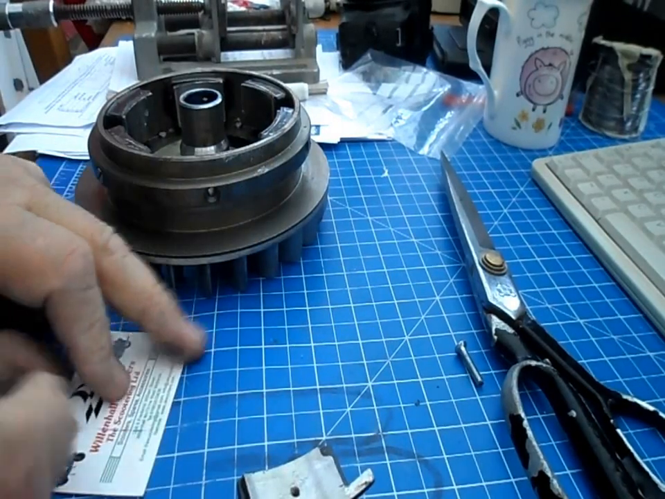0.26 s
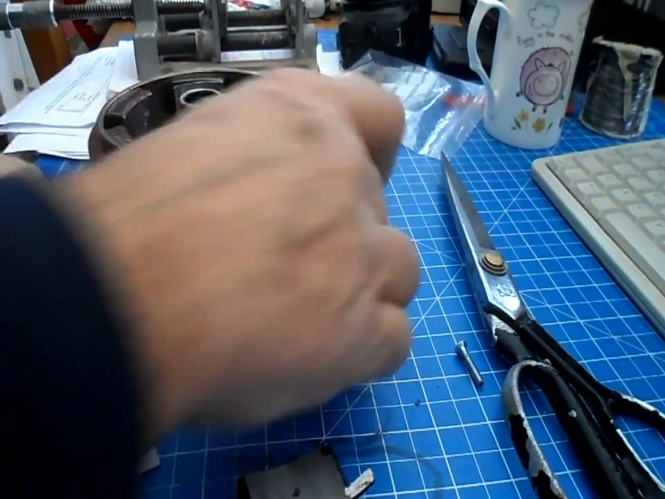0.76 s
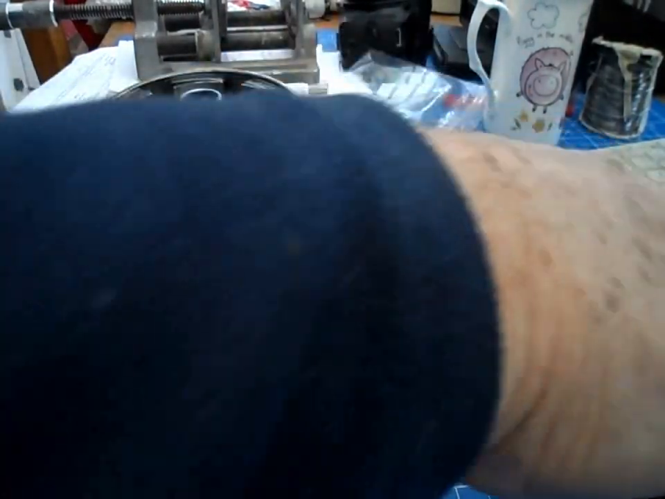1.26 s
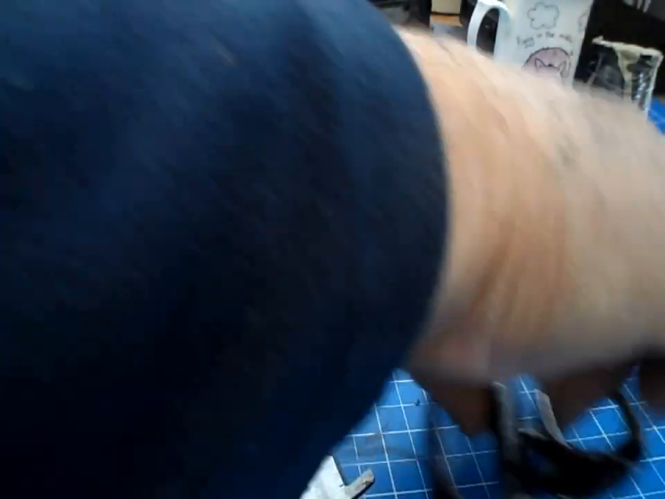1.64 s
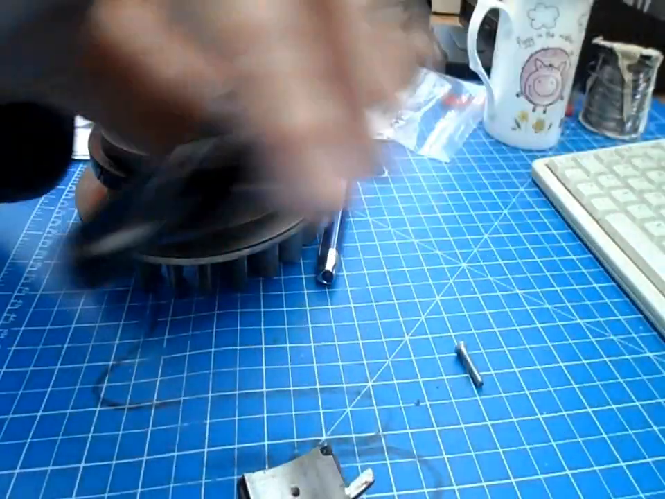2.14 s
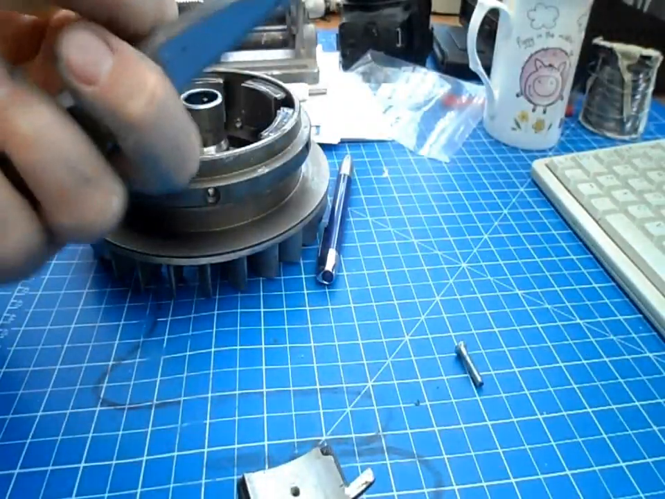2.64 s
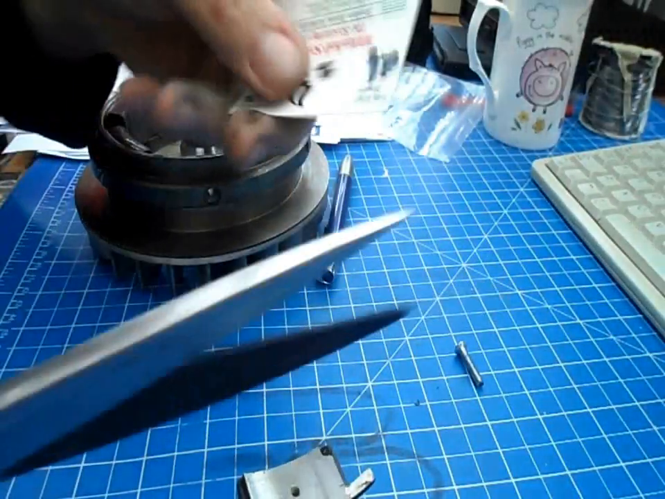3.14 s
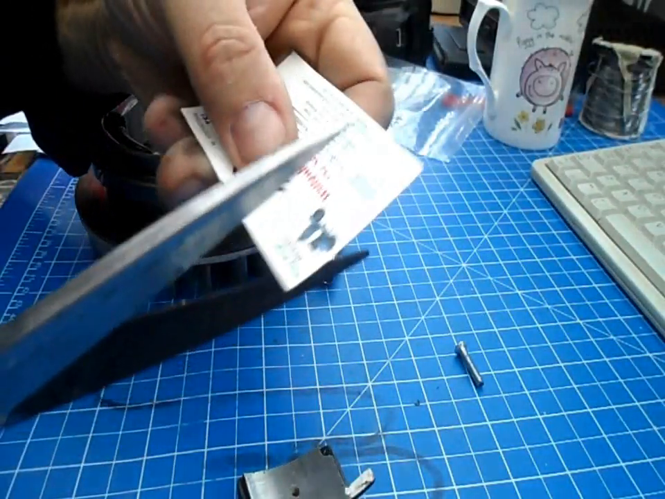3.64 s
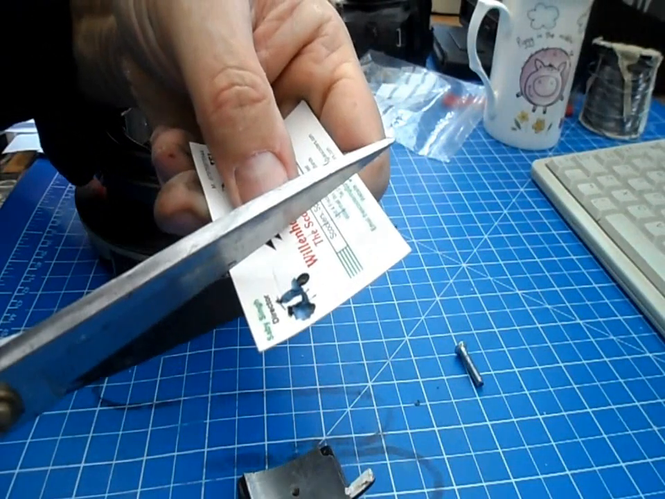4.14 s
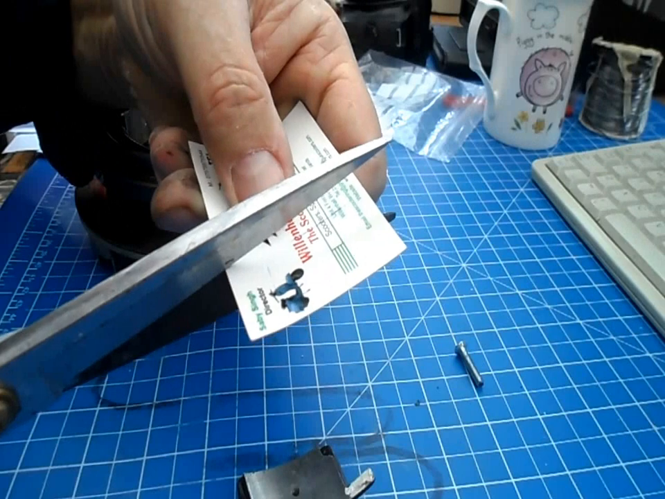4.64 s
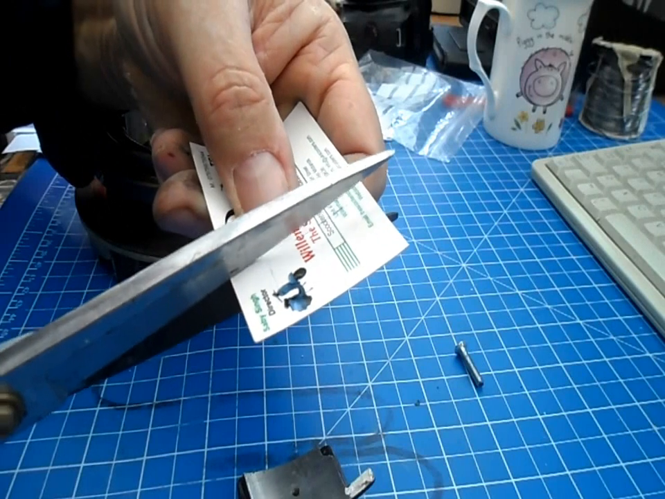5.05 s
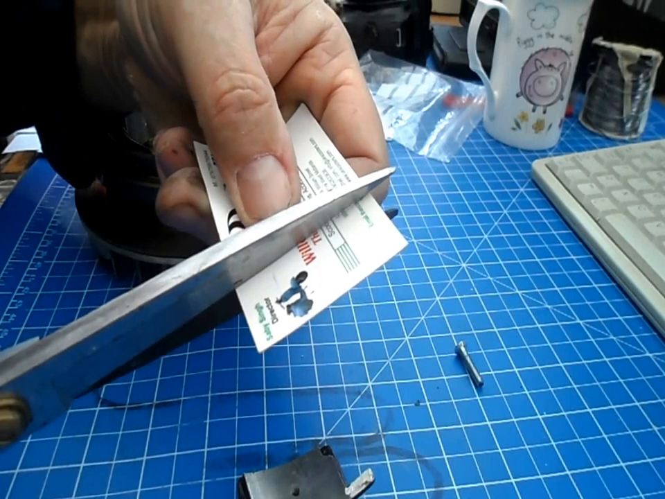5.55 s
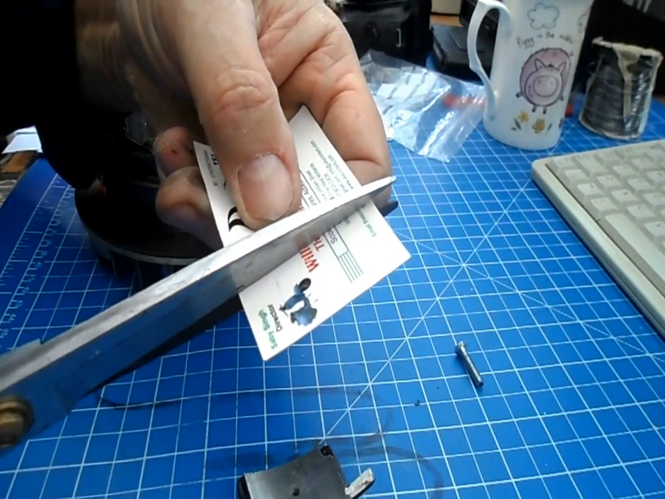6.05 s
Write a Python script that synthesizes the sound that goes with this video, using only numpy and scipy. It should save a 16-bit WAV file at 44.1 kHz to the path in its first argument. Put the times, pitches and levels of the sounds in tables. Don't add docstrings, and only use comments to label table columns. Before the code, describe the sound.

A quiet small room with low building rumble, faint hum and recorder hiss, heard from close to a bench. From 0 to 1 s, card and hand rub softly over a mat with papery swishes, low drag and tiny grit ticks. At 1.14 s a pen drops: hard woody knocks and bright plastic clicks bounce until 1.3 s, loudest at 1.22. At 1.74 s scissors clack with a sharp, bright steel rattle, then a duller handle knock and low thump at 1.96. A faint distant moan passes at 2.0-2.5 s. Light metal clicks come at 2.58 and around 2.65. From 3.15 to 3.5 s blades click, squeak and rasp on card; swishing scrapes follow near 3.8 and 4.2. Quiet hiss remains, with a brief low moan near 4.9. From 5.2 to 6.3 s the blades creep through card in faint, dry, irregular fibre crackles.

```python
import sys
import numpy as np
from scipy import signal
from scipy.fft import rfft, irfft, next_fast_len
from scipy.io import wavfile
from scipy.ndimage import uniform_filter1d

SR = 44100
rng = np.random.default_rng(int(sys.argv[2]) if len(sys.argv) > 2 else 0)


def gain_from_decibels(decibels):
    exponent = np.asarray(decibels, float) / 20
    return 10 ** exponent


def bounce(signal):
    frames = np.transpose(np.atleast_2d(signal))
    limited = np.clip(frames, -1, 1)
    pcm = np.round(limited * 32767).astype(np.int16)
    wavfile.write(sys.argv[1], SR, pcm)


N = 277389


def evened(x):
    return x / np.sqrt(np.mean(x ** 2) + 1e-20)


def peaked(x):
    return x / np.sqrt(uniform_filter1d(x ** 2, 176).max() + 1e-20)


def read(points, hz):
    f, value = np.transpose(points)
    return np.interp(np.log(hz + 1), np.log(f + 1), value)


def add(mix, s, sound):
    part = mix[round(s * SR):][:len(sound)]
    part += sound[:len(part)]


def coloured(x, spectrum):
    size = next_fast_len(len(x))
    gain = gain_from_decibels(read(spectrum, np.fft.rfftfreq(size, 1 / SR)))
    return evened(irfft(rfft(x, size) * gain, size)[:len(x)])


def patchy(x, patch_db):
    z = signal.stft(x, nperseg=256)[2]
    patches = uniform_filter1d(rng.standard_normal(z.shape), size=5, axis=0)
    patches = evened(uniform_filter1d(patches, size=8, axis=1))
    gain = gain_from_decibels(patch_db * 2 * np.tanh(patches / 2))
    return signal.istft(z * gain, nperseg=256)[1][:N]


def contact(length):
    t = np.arange(1300) / SR
    return rng.standard_normal(len(t)) * np.exp(-t / max(length, .0001))


def tick(force, low_hz, high_hz):
    band = signal.butter(3, [low_hz, min(high_hz, 20000)], "band", fs=SR, output="sos")
    return peaked(signal.sosfilt(band, force))


def ring(force, modes, spread, longest, pitch=1):
    t = np.arange(0, min(longest + .05, .25), 1 / SR)
    hz, db, t60 = np.transpose(modes)[:, :, None]
    luck = rng.standard_normal((2, len(modes), 1))
    hz = hz * pitch * (1 + spread * luck[1])
    reach = abs(np.exp(2j * np.pi * hz * t[:len(force)]) @ force)[:, None]
    decay_db = 60 * t / np.clip(t60, .002, longest)
    fall = gain_from_decibels(db + 1.5 * luck[0] - decay_db) / (reach + .1 * reach.mean())
    response = (fall * np.sin(2 * np.pi * hz * t + 1.027 * luck[1])).sum(0)
    return peaked(signal.fftconvolve(response, force)[:len(t)])


# pitch_hz [Hz], level_db [dB rms]
HUM_TONES = [(30, -69.5), (347, -85.5)]


def hum():
    t = np.arange(N) / SR
    waver = uniform_filter1d(rng.standard_normal(N), size=9000)
    waver = evened(uniform_filter1d(waver, size=9000))
    out = np.zeros(N)
    for hz, db in HUM_TONES:
        out += np.sqrt(2) * gain_from_decibels(db + 0.54 * waver) * np.sin(2 * np.pi * hz * (t + 0.0018 * waver))
    return out


# pitch_hz [Hz], level_db [dB per Hz]
RUMBLE_SPECTRUM = [(7.1, -9), (12, -4), (32, -1), (98, -9.5), (117, -10), (135, -9), (220, -15.5),
                   (259, -19.5), (288, -16.5), (316, -22.5), (345, -14.5), (371, -22), (406, -22),
                   (563, -26), (900, -38), (1170, -49.5), (1980, -120)]


def rumble():
    return gain_from_decibels(-62.5) * coloured(rng.standard_normal(N), RUMBLE_SPECTRUM + [(1100, -82.0)])


# pitch_hz [Hz], level_db [dB per Hz]
HISS_SPECTRUM = [(290, -26.5), (500, -8), (700, -2), (764, -2), (1660, -5.5), (2220, -7.5), (3990, -9.5),
                 (15100, -14), (16500, -14)]


def hiss():
    return gain_from_decibels(-71) * coloured(rng.standard_normal(N), [(400, -64.5)] + HISS_SPECTRUM)


def hush(x):
    power_db = 10 * np.log10(abs(uniform_filter1d(x ** 2, 2000)) + 1e-12)
    fall = np.arange(N) * 9.5 / SR
    held_db = np.maximum.accumulate(power_db + fall) - fall
    over_db = np.maximum(held_db + 43.0, 0)
    return gain_from_decibels(-.3 * uniform_filter1d(over_db, 2000))


# start_s [s], pitch_hz [Hz], level_db [dB]
MOAN_GLIDES = [
    [(2.04, 277, -67.5), (2.138, 277.2, -74), (2.254, 277.5, -67.5), (2.378, 233.6, -65),
     (2.422, 226.4, -64.5), (2.48, 228, -74), (2.5, 258, -80)],
    [(4.9, 219, -79), (4.92, 228.7, -68.5), (5.016, 223, -63.5), (5.034, 217, -86.5), (5.05, 209.7, -71)],
]


def moans():
    out = np.zeros(N)
    for rows in MOAN_GLIDES:
        s, hz, db = np.transpose(rows)
        t = np.arange(s[0], s[-1], 1 / SR)
        phase = 2 * np.pi * np.cumsum(np.interp(t, s, hz)) / SR
        tone = np.sin(phase) * signal.windows.tukey(len(t), .2)
        add(out, s[0], np.sqrt(2) * gain_from_decibels(np.interp(t, s, db)) * tone)
    return out


# pitch_hz [Hz], t60_s [s]
ROOM_T60 = [(100, 0.265), (400, 0.35), (1000, 0.34), (3000, 0.32), (8000, 0.22), (16000, 0.2)]
# pitch_hz [Hz], level_db [dB]
ROOM_SPECTRUM = [(100, -8.5), (350, 4.5), (600, 0.5), (950, -2.5), (1500, -3), (2100, -4.5), (3000, -2),
                 (4500, -5), (8000, 0.5), (13000, 0)]


def room(x):
    hz, t, z = signal.stft(rng.standard_normal(SR // 2), SR, nperseg=256)
    z = z / (abs(z) + 1e-9)
    decay_db = 60 * t / np.maximum(read(ROOM_T60, hz), .03)[:, None]
    tail = signal.istft(z * gain_from_decibels(read(ROOM_SPECTRUM, hz)[:, None] - decay_db), SR, nperseg=256)[1]
    tail = signal.sosfilt(signal.butter(2, 110, "high", fs=SR, output="sos"), tail)
    tail = tail * np.clip((np.arange(len(tail)) / SR - .007) / 0.0031, 0, 1)
    return signal.fftconvolve(x, tail / np.linalg.norm(tail))[:N]


# start_s [s], level_db [dB], low_hz [Hz],
# high_hz [Hz]
CONTACT_SPECKS = [(.008, -58.5, 2000, 16000), (.012, -49.5, 4320, 9167), (.0125, -57.5, 9000, 16000),
                  (.225, -54, 8300, 14000), (0.25, -54, 9720, 15000), (.299, -57.5, 6500, 14000),
                  (.347, -54, 7500, 16000), (.648, -67, 10000, 15000), (1.634, -62, 4800, 11000),
                  (1.637, -61.5, 4500, 9500), (1.7422, -37.5, 3000, 14030), (1.7456, -34, 3000, 14000),
                  (2.895, -72, 1500, 5000), (3.02, -68, 4000, 11100), (3.287, -70, 6000, 10000),
                  (3.3838, -52, 8000, 15500), (3.4035, -56, 7500, 15000), (3.406, -57, 7500, 15000),
                  (3.4113, -58, 1500, 4000), (3.4685, -51, 6000, 12000)]


def specks():
    out = np.zeros(N)
    for s, db, low_hz, high_hz in CONTACT_SPECKS:
        add(out, s, gain_from_decibels(db) * tick(contact(.0008), low_hz, high_hz))
    return out


# start_s [s], length_s [s],
# from_hz [Hz], to_hz [Hz], level_db [dB]
SQUEAK_GLIDES = [(0.79, 0.091, 3500, 3350, -70), (.82, 0.39, 3350, 3350, -71),
                 (3.152, 0.0165, 3400, 3450, -67), (1.855, 0.044, 2500, 2400, -70),
                 (1.197, 0.007, 3000, 2400, -44), (1.8, 0.037, 600, 600, -55.5),
                 (.675, 0.023, 7300, 7100, -73), (.115, .11, 6700, 6300, -63.5),
                 (3.465, 0.036, 5000, 5250, -62), (3.48, .03, 8100, 6500, -64),
                 (3.401, 0.0133, 4000, 3150, -50.5), (3.402, 0.0112, 2340, 1740, -53),
                 (3.406, 0.0085, 820, 730, -54.5), (3.463, .024, 2400, 1000, -54),
                 (3.46, 0.026, 3000, 2660, -58), (3.464, 0.012, 7200, 7300, -51),
                 (3.455, .018, 7100, 8900, -54), (3.45, .02, 10500, 11000, -58),
                 (3.46, .03, 9000, 11500, -55.5), (3.45, 0.022, 12000, 12500, -58),
                 (3.491, 0.016, 3500, 3600, -61), (3.541, .028, 3600, 3900, -63.5),
                 (4.2, 0.036, 3600, 3900, -64), (3.548, 0.023, 6100, 5900, -65),
                 (3.62, 0.34, 3950, 4050, -72.5), (1.517, 0.029, 240, 246, -57.5)]
SQUEAK_BANDWIDTH = 140, 0.032, 500
# start_s [s], length_s [s], from_hz [Hz], to_hz [Hz], level_db [dB]
SWISH_GLIDES = [
    (.004, 0.097, 905, 847, -53),
    (.67, 0.046, 2800, 3160, -60.5),
    (1.6, .1, 910, 788, -66.5),
    (2.585, .06, 5900, 5600, -65.5),
    (3.198, .04, 5600, 5300, -62),
    (3.252, .03, 5000, 5400, -66),
    (3.79, 0.11, 5860, 5020, -58),
    (3.82, 0.11, 4025, 4530, -60.5),
    (4.165, 0.12, 1987, 2093, -62),
    (4.17, 0.13, 4990, 3510, -62),
]
SWISH_BANDWIDTH = 30, 0.42, 0


def squeaks():
    out = np.zeros(N)
    for rows, (width_hz, share, blur_hz) in ((SQUEAK_GLIDES, SQUEAK_BANDWIDTH),
                                             (SWISH_GLIDES, SWISH_BANDWIDTH)):
        for start, length, from_hz, to_hz, db in rows:
            t = np.arange(0, 1, 1 / SR / max(length, .004))
            carrier = np.exp(2j * np.pi * np.cumsum(from_hz * (to_hz / from_hz) ** t) / SR)
            width = max(width_hz + share * from_hz + blur_hz * length, 30)
            pole = [1, -np.exp(-np.pi * width / SR)]
            noise = [1, 1j] @ rng.standard_normal((2, SR // 2))
            slow = signal.lfilter([1], pole, signal.lfilter([1], pole, noise))[-len(t):]
            swell = np.sin(np.pi * t ** 0.57)
            add(out, start, gain_from_decibels(db) * evened((carrier * slow).real) * swell)
    return out


# pitch_hz [Hz], level_db [dB per Hz]
HISS_OF_RUB = [(2350, -27), (4000, -7), (5280, -1), (8550, 0.5), (11200, 0), (15100, -3.5), (16000, -23)]
RASP_OF_RUB = [(1200, -1.5), (1700, 1.5), (2600, 3), (4000, -2), (5000, -6.5), (6500, -57)]
BODY_OF_RUB = [(520, -30), (740, -4), (880, 0), (1020, -2), (1200, -8), (1600, -11), (2400, -26),
               (7000, -33), (9000, -48)]
DRAG_OF_RUB = [(25, -3), (60, -3.5), (130, 0), (300, -6), (550, -11), (750, -25.5), (7000, -32),
               (10000, -42.5)]
# start_s [s], fastest_s [s], end_s [s], level_db [dB], pressure_db [dB]
SLIDE_STROKES = [(1.138, 1.175, 1.25, -53, 6), (1.222, 1.238, 1.36, -51.5, 1), (0, .11, 0.66, -64, -5),
                 (.005, .009, 0.091, -70, 31.5), (0.004, .055, 0.4, -80.5, 26), (.085, .285, 0.47, -53, -8),
                 (.08, .36, 0.52, -69.5, 13.5), (.2, .5, 1.5, -68.5, -4.5), (.665, .688, 1.75, -72, 11),
                 (.73, .862, 0.95, -51, -10.5), (.76, .832, 0.94, -73.5, 25), (.78, 1.0, 1.68, -69.5, 0.5),
                 (1.6, 1.638, 1.76, -76, 15), (1.745, 1.76, 1.85, -55, -8), (1.83, 1.87, 2.1, -70.5, 3),
                 (1.97, 2.007, 2.08, -67.5, 3)]
# start_s [s], fastest_s [s], end_s [s], level_db [dB], bite_db [dB]
SCRAPE_STROKES = [(2.58, 2.6, 3.1, -74, -15), (2.78, 2.9, 3.4, -75.5, -11.5), (3.185, 3.22, 3.34, -65, -7),
                  (3.24, 3.262, 3.9, -79, -5.5), (3.385, 3.391, 3.89, -62.5, -1),
                  (3.44, 3.468, 3.535, -51, -16), (3.5, 3.64, 4.4, -69.5, -18),
                  (3.76, 3.808, 4.01, -58.5, -3), (3.78, 3.886, 3.93, -53.5, -14),
                  (3.92, 3.984, 4.1, -65, -4.5), (4.16, 4.168, 4.23, -68, 5), (4.16, 4.24, 4.35, -64.5, 4),
                  (5.2, 5.38, 5.65, -76, -5.5), (5.66, 5.73, 4.8, -82, -10.5), (5.84, 6, 6.7, -94.5, -15),
                  (6.1, 6.27, 5.9, -81, -4)]
# start_s [s], fastest_s [s], end_s [s], level_db [dB], pressure_db [dB]
DRAG_STROKES = [
    (0, .06, 0.44, -58, 20.5),
    (.2, .75, 1.6, -62.5, -1),
    (1.6, 1.635, 1.73, -62.5, -55.5),
    (1.77, 1.83, 1.92, -57, -8),
    (1.99, 2.006, 2, -59, -2),
]
# levels of hiss, rasp, body, drag [dB]; share of the pressure or bite in each [ratio]
SLIDE_BALANCE = (-2.5, -8, -4.5, -17), (0.053, 0.57, 0.94, 0.042), 1.16
SCRAPE_BALANCE = (-0.5, -0.5, -24, -27), (0.042, 0.68, .4, 0.15), 1.42
DRAG_BALANCE = (-63, -60, -15.5, 2), (0, 0, 1, 0), 1.2


def rubs():
    catches = rng.standard_normal(N) * gain_from_decibels(0.83 * np.minimum(rng.exponential(1, N), 5))
    judder = uniform_filter1d(uniform_filter1d(rng.standard_normal(N), 300), 300)
    catches = catches * gain_from_decibels(0.83 * evened(judder))
    kinds = (HISS_OF_RUB, 3.2), (RASP_OF_RUB, 3.2), (BODY_OF_RUB, 1.5), (DRAG_OF_RUB, 1.5)  # patchiness, dB
    layers = np.array([coloured(patchy(catches, patch_db), spectrum) for spectrum, patch_db in kinds])
    power = np.zeros((4, N))
    for rows, (mix_db, shares, pointed) in ((SLIDE_STROKES, SLIDE_BALANCE),
                                            (SCRAPE_STROKES, SCRAPE_BALANCE),
                                            (DRAG_STROKES, DRAG_BALANCE)):
        for start, fastest, end, db, extra_db in rows:
            at = np.arange(max(round(start * SR), 0), min(round(end * SR), N))
            first = .5 * (start <= 0)
            swell = np.interp(at / SR, [start, fastest, end], [first, 1, 0]) ** max(pointed, 1.6)
            level = gain_from_decibels(db + np.add(mix_db, extra_db * np.array(shares)))[:, None]
            power[:, at] += (level * swell) ** 2
    return (layers * np.sqrt(power)).sum(0)


# pitch_hz [Hz], level_db [dB], t60_s [s]
BENCH_MODES = [(616, -11, 0.017), (790, -5.5, 0.039), (905, 6, 0.02), (990, 1.5, .018), (1170, -1, 0.033),
               (1373, 2, 0.024), (1720, 0.5, 0.012), (1940, -6.5, .012), (2740, -12, 0.026)]
THUD_MODES = [(113, -13, .14), (170, -13, .06), (242, -7, .07), (312, -3, .09), (350, -1.5, .085),
              (410, -6, .06), (490, -6, .05)]
BARREL_MODES = [(2800, 6, 0.0045), (3220, 1, 0.011), (4410, 11, 0.00073), (5250, 0.5, 0.0024),
                (6700, -30.5, 0.0055)]
# start_s [s], bench level_db [dB], thud_db [dB re bench], click_db [dB re bench],
# bench pitch factor [ratio]
PEN_BOUNCES = [(1.137, -47.5, -9, -20, 1.6), (1.139, -25.5, -9, -12.5, 1.2), (1.1408, -34.5, -8, -16, .85),
               (1.148, -36.5, -4, -22, 0.65), (1.165, -33, -10.5, -10, 1.2), (1.183, -36.5, -6, -4.5, 0.86),
               (1.193, -46, -11.5, -16, 1.4), (1.2, -46, -2.5, -4.5, 3.1), (1.2228, -15, -14.5, -12, 1.017),
               (1.2326, -38, 6, -8.5, 1.2), (1.2859, -32, -9.5, -6, 1.26),
               (1.2873, -24.5, -19.5, -26.5, 0.975), (1.314, -41.5, -4, -20, 1.07)]
# start_s [s], level_db [dB], low_hz [Hz], high_hz [Hz], contact_s [s]
BARREL_TICKS = [
    (1.14, -52, 6000, 12000, .003),
    (1.1402, -47, 11100, 16000, .002),
    (1.151, -56, 9000, 16000, .002),
    (1.167, -56, 10000, 14000, .002),
    (1.185, -55, 8500, 16000, .002),
    (1.199, -53, 6000, 16000, 0.0035),
    (1.2235, -38, 7000, 16000, .0018),
    (1.2322, -47, 6000, 10000, .003),
    (1.236, -55, 7000, 15000, 0.011),
    (1.2857, -50.5, 6500, 16000, .003),
]


def pen():
    out, blow = np.zeros(N), np.hanning(15)
    for s, db, thud_db, click_db, pitch in PEN_BOUNCES:
        add(out, s, gain_from_decibels(db) * ring(blow, BENCH_MODES, 0.01, longest=.05, pitch=pitch))
        add(out, s, gain_from_decibels(db + thud_db) * ring(blow, THUD_MODES, .015, longest=.25))
        click = ring(contact(0.00018), BARREL_MODES, 0.075, longest=0.01785)
        add(out, s, gain_from_decibels(db + click_db + 1.5) * click)
        add(out, s, gain_from_decibels(db + click_db - 3.0) * tick(contact(0.0018), 1290, 5470))
    for s, db, low_hz, high_hz, length in BARREL_TICKS:
        add(out, s, gain_from_decibels(db) * tick(contact(length), low_hz, high_hz))
    return out


# start_s [s], level_db [dB]
HANDLE_LANDINGS = [
    (1.9608, -42.5),
    (1.742, -54),
]
# pitch_hz [Hz], level_db [dB], t60_s [s]
SAG_MODES = [(113.3, 1, 0.19), (200.7, -5, 0.046)]


def thumps():
    out = np.zeros(N)
    for s, db in HANDLE_LANDINGS:
        add(out, s, -gain_from_decibels(db) * ring(np.hanning(60), SAG_MODES, .01, longest=.3))
    return out


# pitch_hz [Hz], level_db [dB], t60_s [s]
FREE_STEEL_MODES = [(2304, -1.5, 0.026), (2750, -1, .025), (3110, 2.5, 0.021), (4350, 1, 0.036),
                    (5000, -15, .015), (5555, 8.5, 0.025), (6365, 5.5, .02), (6600, 7, 0.033),
                    (7140, -1.5, .015), (8200, 9, 0.04), (9100, 7, 0.027), (9900, 3.5, 0.025),
                    (11650, -9, .03), (14285, -3, .025)]
GRABBED_STEEL_MODES = [(831, -6, 0.042), (1560, -1.5, 0.057), (2370, 2.5, 0.03), (2993, -2, 0.02),
                       (3530, 9, 0.012), (5480, 4, 0.013), (6500, -6, 0.017), (8040, -6, 0.027),
                       (9426, -14, .04)]
HELD_STEEL_MODES = [(1990, -6.5, 0.012), (3386, -1, 0.011), (4605, -8, 0.0087), (5480, 6.5, 0.011),
                    (5970, 5.5, 0.0092), (6900, 6, 0.0082), (8800, -14, .008), (9330, 3.5, .014),
                    (10700, 1, .01), (12900, -5, .008)]
HANDLE_MODES = [(686, 10.5, 0.0025), (1063, 6, 0.012), (1380, -8, 0.061), (1790, -9.5, 0.0079),
                (2090, -3, 0.026), (2650, 11, 0.0076)]
MAT_MODES = [(111.3, -2, 0.28), (199, -5, 0.064), (303, -8, 0.066), (372, -1, 0.031), (545, 1, 0.03)]
# start_s [s], crack level_db [dB], steel_db [dB re crack], handle_db [dB re crack],
# contact_s [s]
SCISSOR_CLACKS = [(1.633, -70, -3, 7, 0.0023), (1.724, -61.5, -4, -1, 0.014),
                  (1.7326, -65, -20, 21, 0.00086), (1.7418, -31.5, -1.5, -11.5, 0.0043),
                  (1.745, -33, -4, -10.5, 0.0023), (1.7484, -41, -6, -9, 0.0036),
                  (1.7525, -44, -7, -12, .003), (1.7583, -50, -8, -14, 0.0028),
                  (1.765, -57, -6, -10, 0.0038), (1.856, -60, -9, -1, .004), (1.875, -63.5, -28, 4, 0.0047),
                  (1.9592, -48, 5, -1.5, 0.0042), (1.9704, -62.5, -2.5, 6, 0.0032),
                  (2.578, -46, 1.5, -30.5, 0.0016), (2.587, -63, -11, -20.5, 0.0019),
                  (2.647, -72.5, -3, 7.5, 0.0021), (2.655, -67.5, -8.5, -6, .003),
                  (2.660, -60.5, -9, 5.5, 0.0053), (2.706, -70, 2, -2.5, 0.011), (2.72, -70, -3, 2, 0.0062),
                  (2.948, -65, -9.5, -11.5, 0.004), (3.151, -59, -1, -13.5, 0.003),
                  (3.3835, -48, -2, -13, 0.005), (3.4033, -52.5, -20, -2.5, 0.0025),
                  (3.412, -68, -10, 6, 0.0014), (3.555, -71, -17, -1, 0.0054),
                  (4.166, -77, -4.5, 13, 0.002)]
LIFTED_S, CLEAR_S = 1.9, 2.1


def scissors():
    out, blow = np.zeros(N), np.hanning(9)
    for s, db, steel_db, handle_db, length in SCISSOR_CLACKS:
        force = contact(length)
        crack_hz = (3000, 13500) if steel_db > -26 else (2000, 8000)
        add(out, s, gain_from_decibels(db) * tick(force, *crack_hz))
        if s < LIFTED_S:
            steel, longest = FREE_STEEL_MODES, .04
        elif s < CLEAR_S:
            steel, longest = GRABBED_STEEL_MODES, .04
        else:
            steel, longest = HELD_STEEL_MODES, .013
        add(out, s, gain_from_decibels(db + steel_db - 2.0) * ring(force, steel, .004, longest))
        add(out, s, gain_from_decibels(db + steel_db - 3.5) * ring(force, steel, 0.0098, longest / 2))
        mat_db, still_db = (3, -0.5) if s < CLEAR_S else (-15, 0)
        add(out, s, gain_from_decibels(db + handle_db + mat_db) * ring(blow, MAT_MODES, .02, longest=.25))
        add(out, s, gain_from_decibels(db + handle_db + still_db) * ring(force, HANDLE_MODES, 0.072, longest=0.072))
    return out


# pitch_hz [Hz], level_db [dB], t60_s [s]
BLADE_MODES = [(3530, 8, 0.0067), (4090, 5, 0.008), (4885, 1, .007), (6067, -2, 0.0062),
               (7700, -3.5, 0.0048), (9100, -3.5, 0.008), (10900, -9.5, 0.0065), (12600, -4.5, 0.0066),
               (14870, -10, .006)]
CARD_MODES = [(1120, 3, 0.013), (1640, -4, 0.012), (1880, -4, .008), (2610, -12.5, 0.0045),
              (737, -12, 0.011)]
# start_s [s], blade level_db [dB], card_db [dB re blade], length_s [s]
FIBRE_SNAPS = [(5.221, -73.5, -3.5, 0.0048), (5.294, -64.5, -1.5, 0.019), (5.328, -73, -5.5, 0.022),
               (5.359, -71, -6.5, 0.0051), (5.369, -63.5, -17.5, 0.015), (5.392, -63, -6, 0.023),
               (5.441, -64.5, -12.5, 0.016), (5.455, -65, -8, .005), (5.462, -63, -3.5, 0.014),
               (5.495, -73.5, -5, .012), (5.536, -65, -5, 0.011), (5.549, -69, -7, .005),
               (5.562, -64.5, -16, 0.0046), (5.693, -54.5, -5, 0.013), (5.725, -64, -7, 0.015),
               (5.767, -64, -6.5, 0.015), (5.885, -66, -4, 0.0078), (5.902, -68.5, -9, 0.011),
               (5.958, -58.5, -2, 0.018), (6.01, -66.5, -6.5, 0.014), (6.078, -69, -6, 0.0083),
               (6.087, -65.5, -4, 0.0065), (6.174, -59.5, -5, 0.009), (6.215, -62, -2, 0.0093),
               (6.245, -64.5, -1.5, 0.011), (6.275, -67, -4, 0.022)]


def cut():
    out = np.zeros(N)
    for s, db, card_db, length in FIBRE_SNAPS:
        u = np.minimum(np.arange(1300) / SR / max(length, .002), 1)
        force = rng.standard_normal(1300) * np.sin(np.pi * u ** 0.78)
        add(out, s, gain_from_decibels(db) * ring(force, BLADE_MODES, 0.015, longest=.008))
        add(out, s, gain_from_decibels(db + card_db) * ring(force, CARD_MODES, 0.026, longest=.03))
        dulling_db = 6.5 * (s - FIBRE_SNAPS[0][0])
        add(out, s, gain_from_decibels(db - dulling_db) * tick(force, 3000, 12000))
    return out


def scene():
    knocks = pen() + scissors() + cut() + specks() + thumps()
    knocks = signal.sosfilt(signal.butter(4, 95, "high", fs=SR, output="sos"), knocks)
    near = knocks + gain_from_decibels(-9.0) * room(knocks) + rubs() + squeaks()
    return (near + moans() + hum() + rumble() + hush(near) * hiss())[None]


def top_cut(x):
    return signal.sosfilt(signal.butter(12, 16030, fs=SR, output="sos"), x)


def record(dry):
    dry = np.clip(dry, -.37, .37)
    edge = signal.firwin(255, 16000, window=("kaiser", 9), fs=SR)
    mix = signal.oaconvolve(dry, edge[None], "same")
    return top_cut(mix)


dry = scene()
out = record(dry)
bounce(out)
```